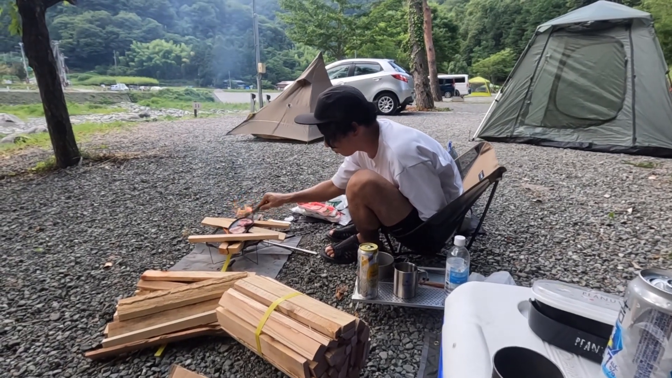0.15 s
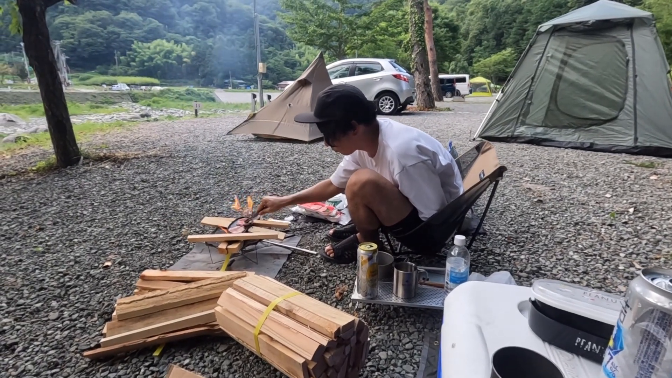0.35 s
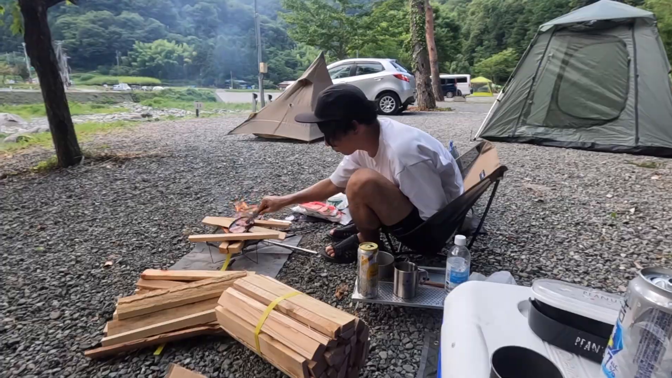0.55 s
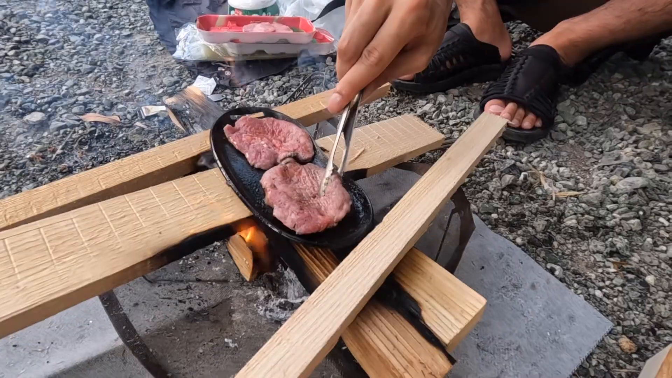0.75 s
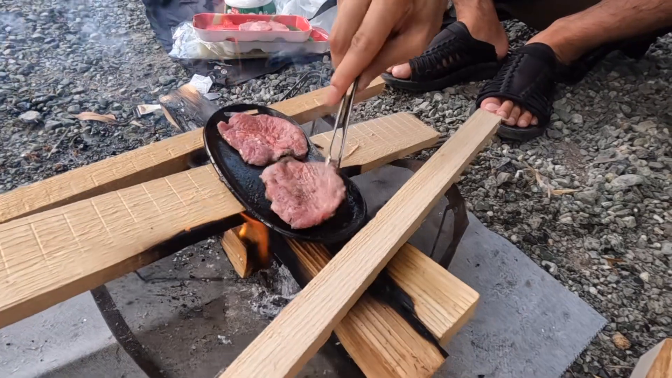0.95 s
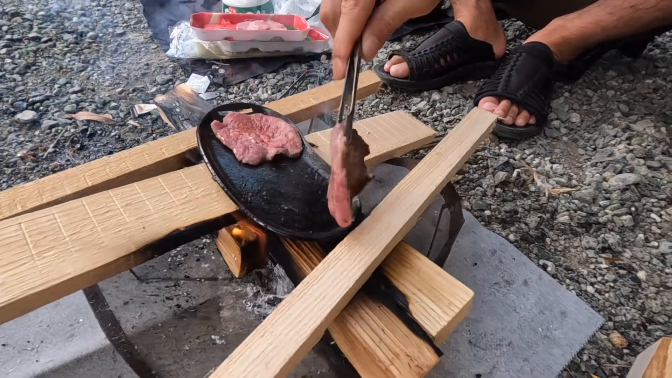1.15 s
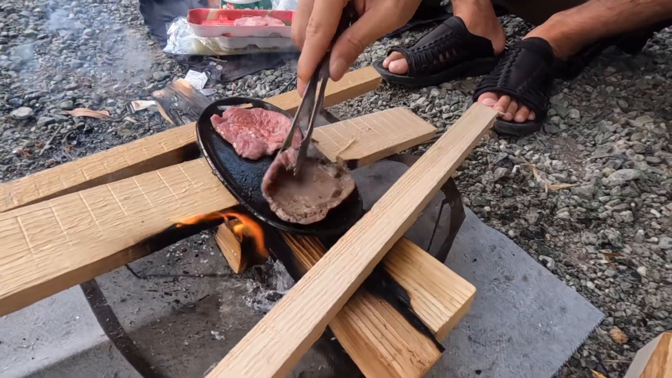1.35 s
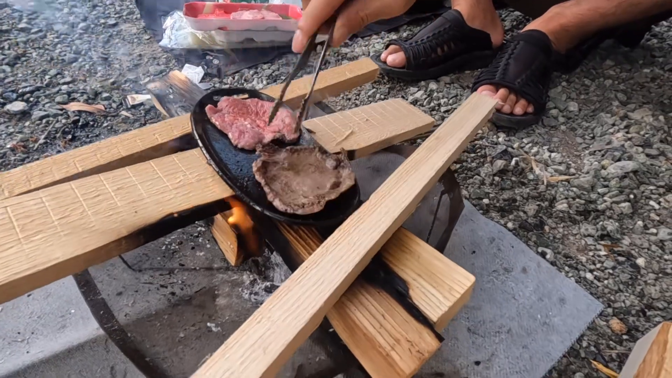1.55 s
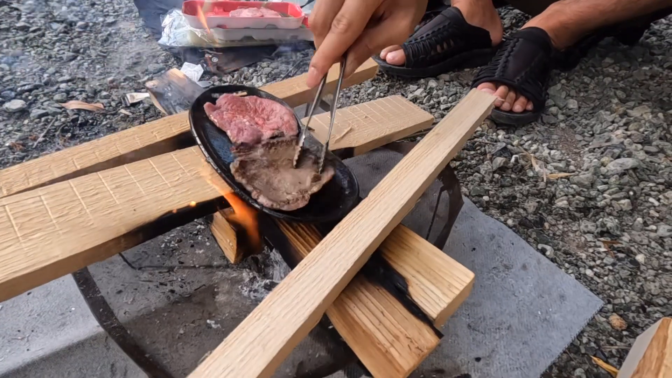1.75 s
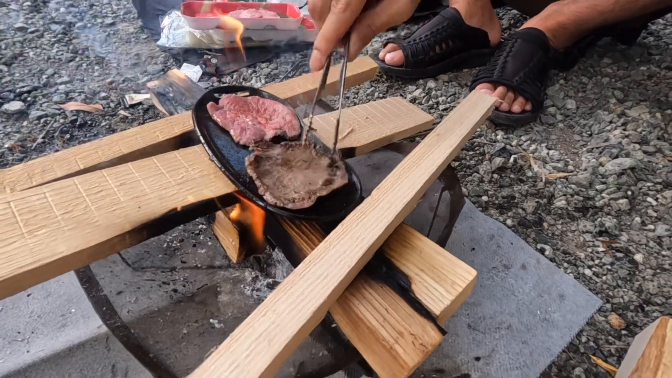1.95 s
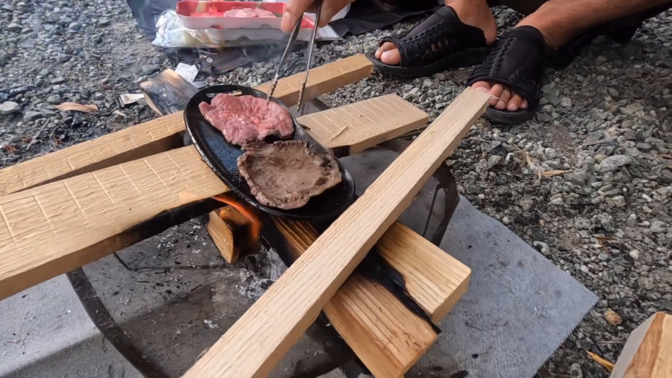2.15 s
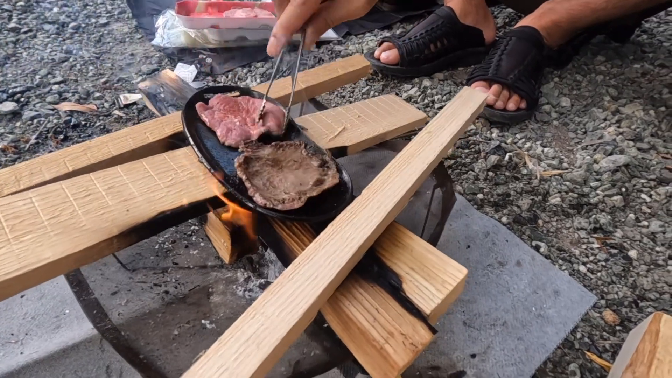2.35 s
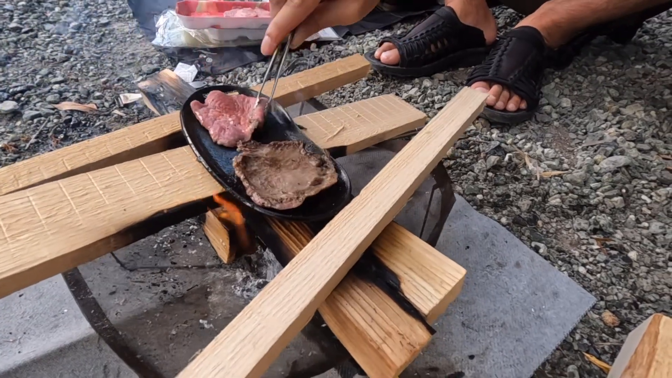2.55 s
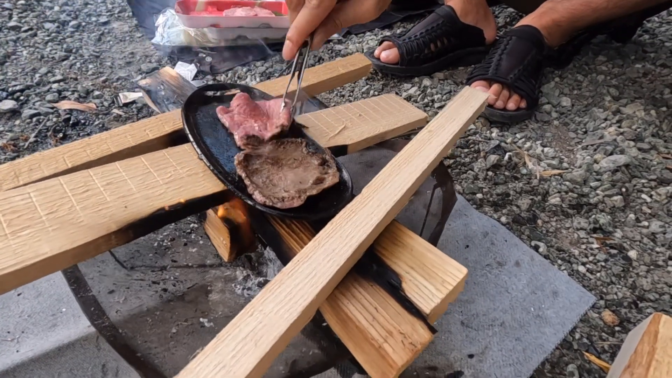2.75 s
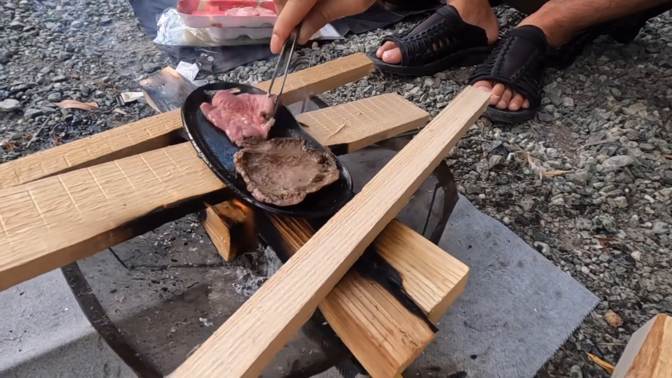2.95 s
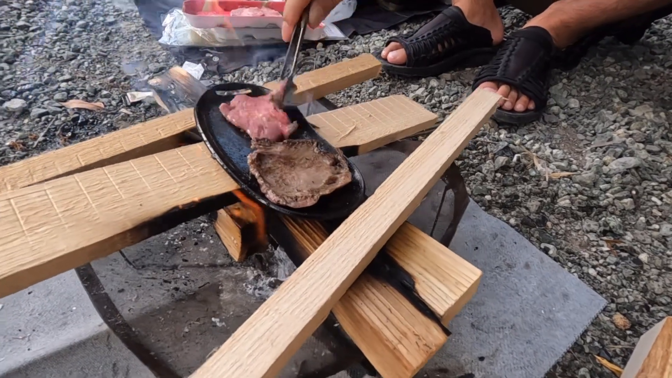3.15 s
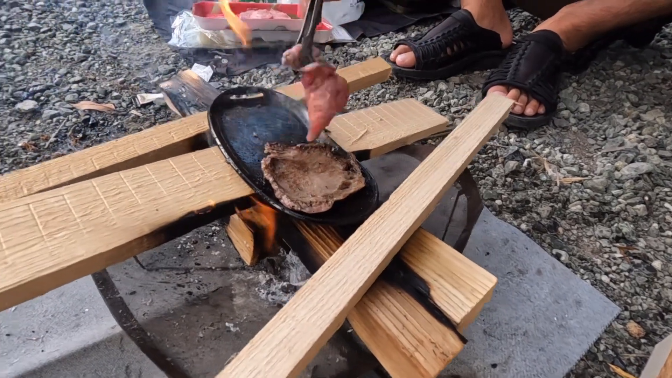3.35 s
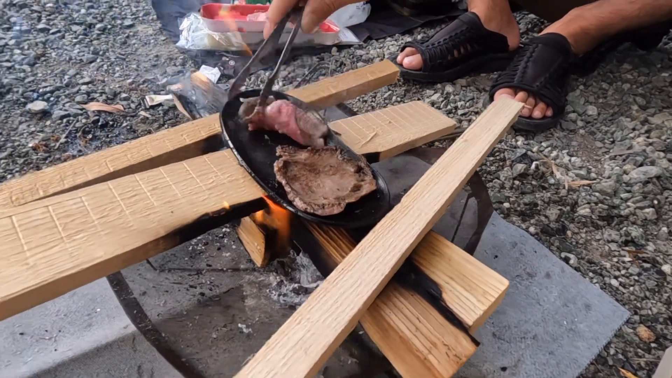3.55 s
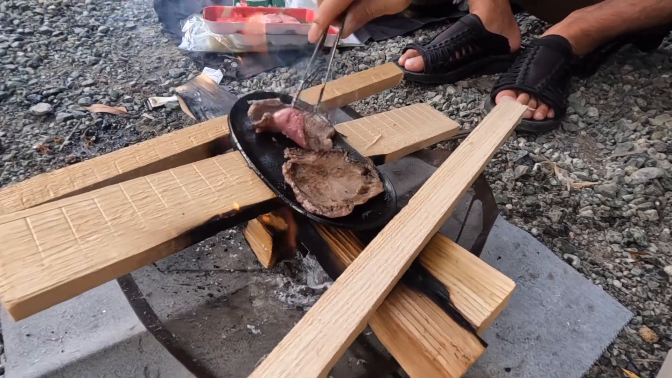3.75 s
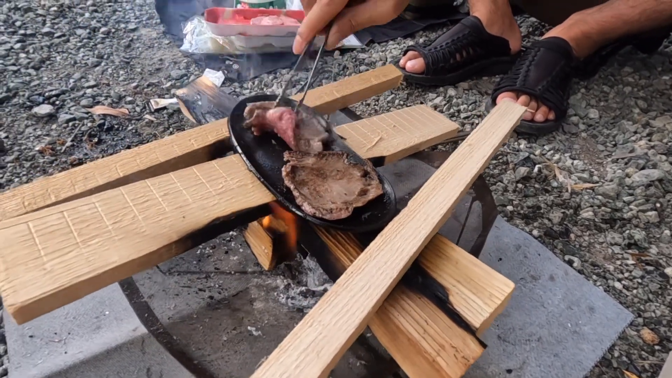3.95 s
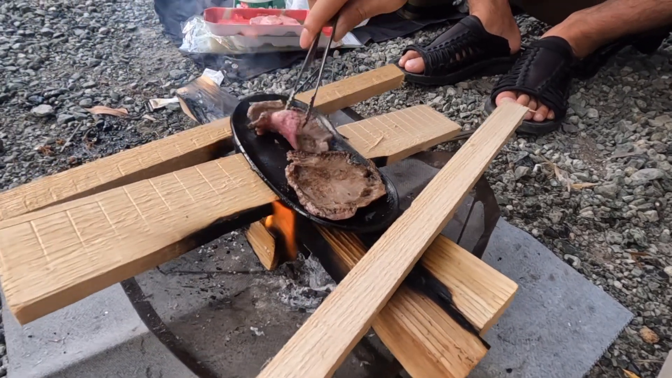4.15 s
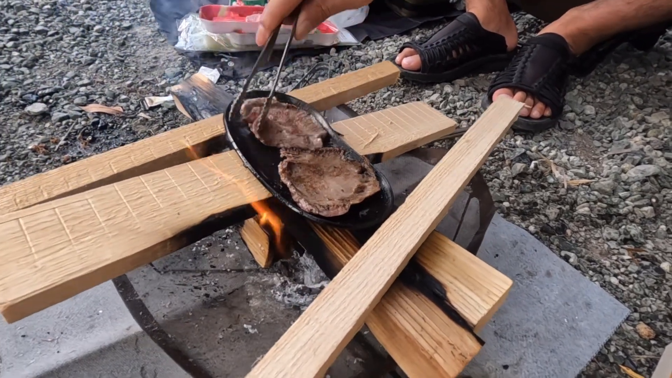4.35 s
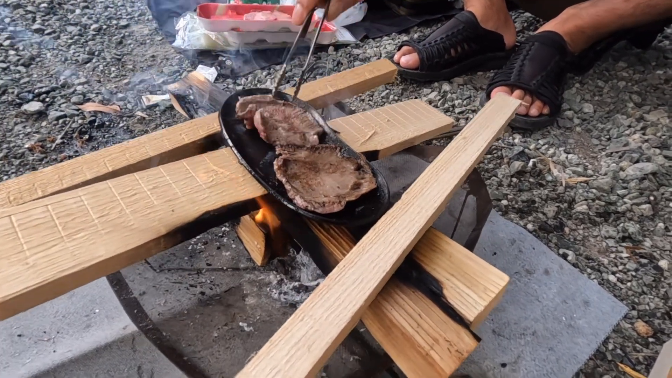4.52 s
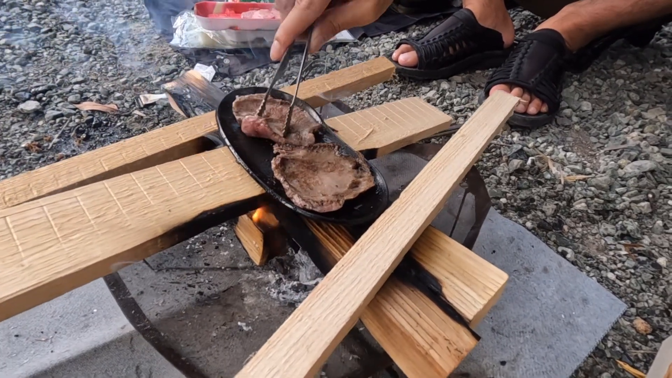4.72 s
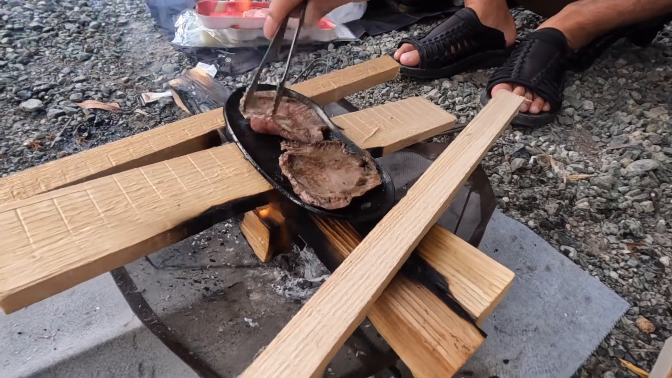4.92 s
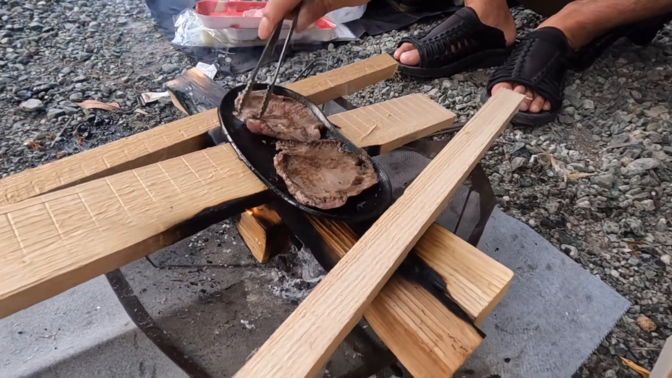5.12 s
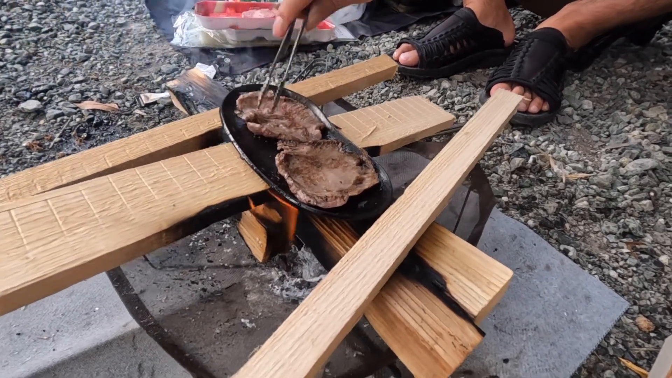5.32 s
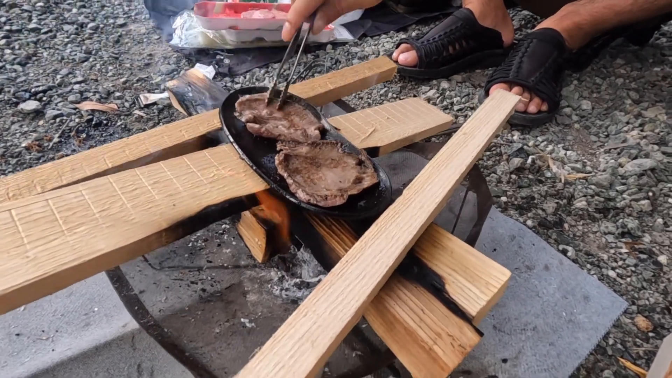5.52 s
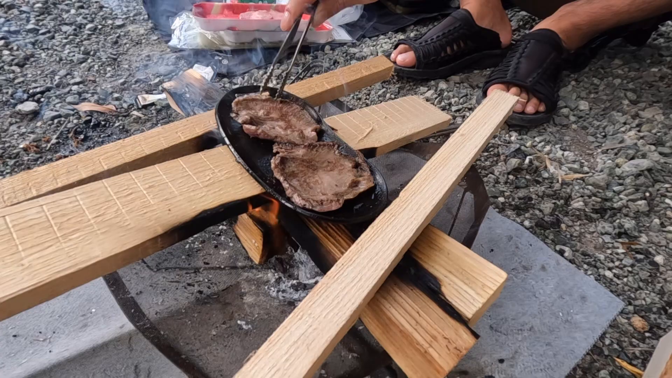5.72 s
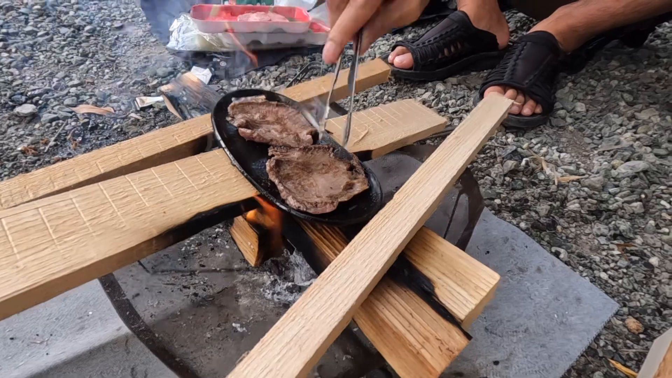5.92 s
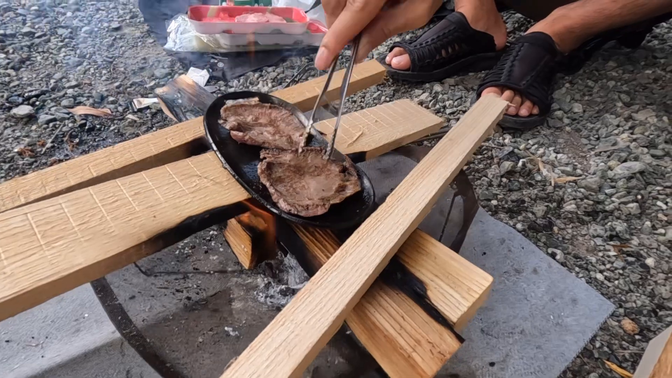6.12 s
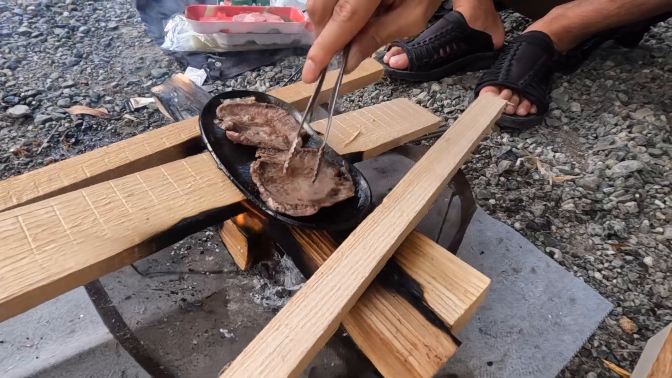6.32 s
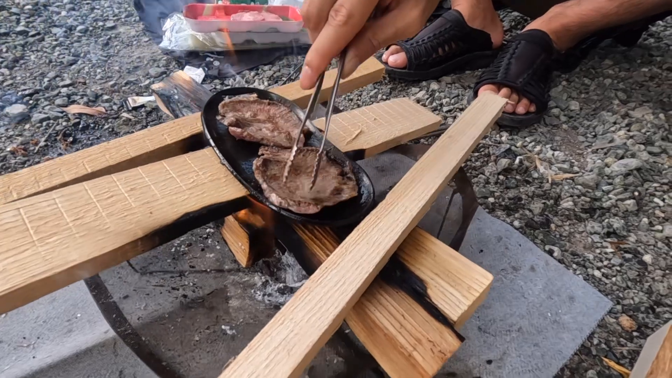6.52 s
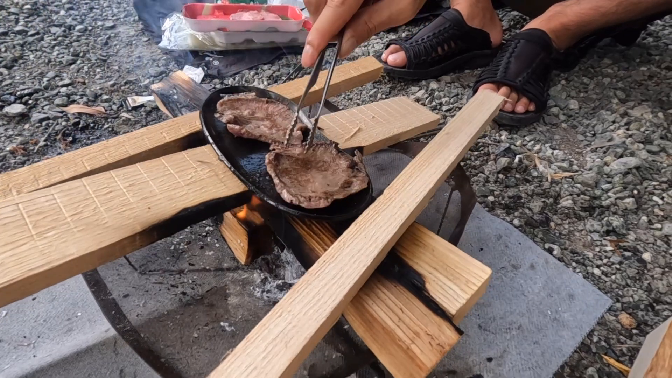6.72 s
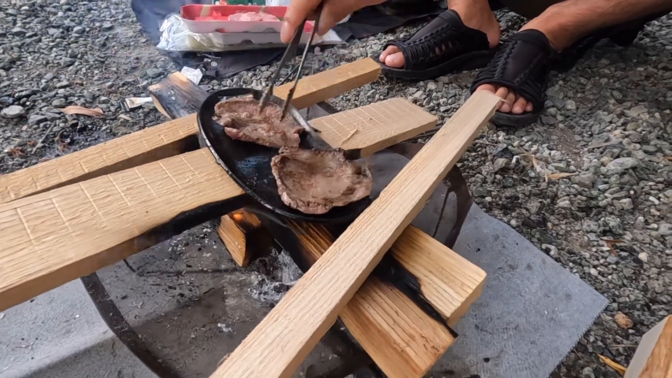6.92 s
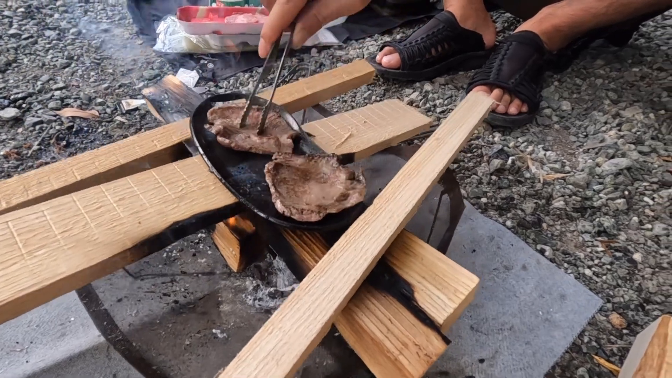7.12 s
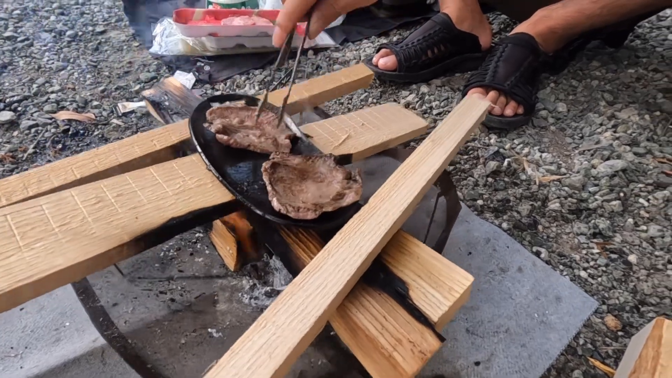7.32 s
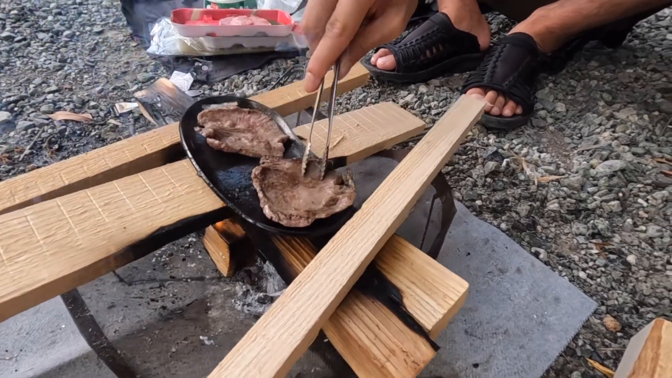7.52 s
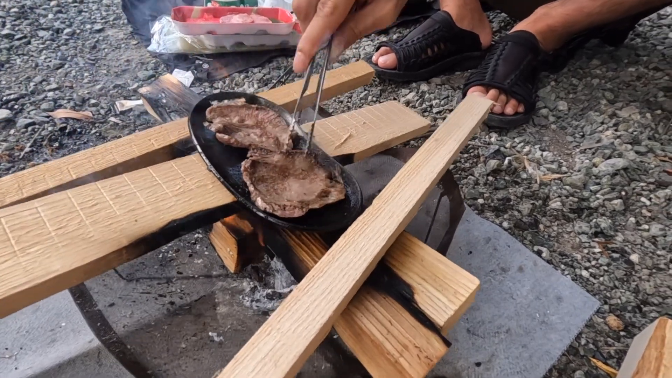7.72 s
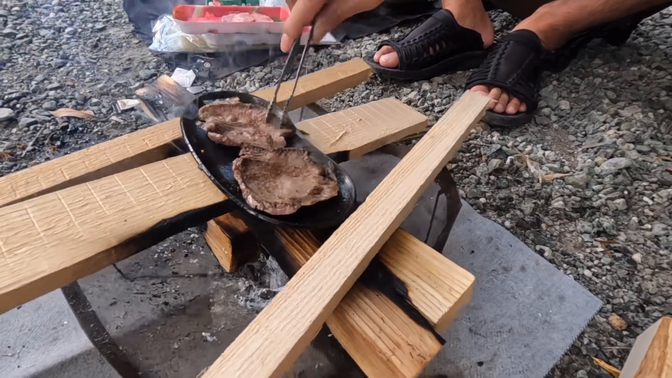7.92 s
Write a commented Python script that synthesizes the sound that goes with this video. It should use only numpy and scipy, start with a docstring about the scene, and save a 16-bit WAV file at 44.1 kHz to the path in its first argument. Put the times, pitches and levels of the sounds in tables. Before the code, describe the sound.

Outdoors, under a second of faint, nearly mono river wash with wind thumping the microphone. A hard cut brings a close iron skillet: thin, crisp sizzling with sharp spits. The fizz strengthens as meat is turned and pressed, surging at about three and a half seconds, then stays dense with wetter simmering. Low flame rumble, river murmur and soft wind buffets continue beneath; loud spits close it.

```python
"""Meat fries in a small iron skillet over a wood fire: steam bubbles burst in the fat as short dying rings
of four sizes (fizz, spray, haze, simmer), with crackle, loud spits and one squeak of steel tongs.
Around it, shaped noise makes flame rumble, wind buffets and river murmur; gusts knock the microphone.
The first 0.68 s are heard from afar: river wash and wind, nearly mono, without the skillet.
The close skillet then reaches two microphone ports with their own phase, lean and width per pitch."""
import sys
import numpy as np
from scipy import signal
from scipy.fft import rfft, irfft, next_fast_len
from scipy.io import wavfile
from scipy.ndimage import uniform_filter1d

SR = 44100
rng = np.random.default_rng(int(sys.argv[2]) if len(sys.argv) > 2 else 0)


def dump_mix(stems):
    """Bounce the given channels to the path in sys.argv[1] as a 16-bit WAV at rate SR."""
    frames = np.atleast_2d(stems).T  # one column per channel
    limited = np.clip(frames, -1, 1)  # hard clip at full scale
    pcm = np.round(limited * 32767).astype(np.int16)
    wavfile.write(sys.argv[1], SR, pcm)


N = 355887
FFT_SIZE = next_fast_len(N + 8192)

# frying: (time [s], fizz level [dB], freshness [0-1, wet meat newly pressed on the iron])
FRYING = [(.69, -45, 0.7), (1.18, -40.5, 0.6), (1.36, -41.5, .2), (1.4, -34.5, .7), (1.55, -37.5, .3),
          (1.72, -36, .3), (1.77, -33, .8), (1.92, -32.5, .9), (1.95, -37, .3), (2.5, -35.5, .3),
          (2.62, -29.5, 0.1), (2.71, -36, .2), (2.76, -29.5, .4), (3.09, -33, 0.5), (3.13, -31, 0.3),
          (3.3, -35.5, .5), (3.53, -37.5, 0.6), (3.545, -27.5, .4), (3.575, -25, .5), (3.59, -23.5, 1),
          (4.6, -28, 0.75), (4.67, -25.5, .9), (4.78, -28, 0), (5.05, -30, .2), (5.35, -28, .1),
          (5.47, -32, .3), (5.55, -28, 0.04), (7.3, -27.5, 0.37), (7.53, -29.5, 0), (7.62, -24.5, 0.4),
          (7.92, -29, 0.3), (8.03, -25, 0.7), (8.07, -25, 0.5)]
# simmer of larger bubbles, growing louder: (time [s], level [dB])
SIMMER_LEVEL = [(.69, -47.5), (1.15, -44.5), (1.37, -46), (1.53, -36), (2, -38.5), (2.8, -36), (3.5, -37),
                (3.6, -35), (4.6, -35), (4.8, -33), (6, -32.5), (7.6, -31.5), (8.07, -32.5)]
# bubble colours, small to large below: (frequency [Hz], relative density [dB per Hz])
HAZE_COLOUR = [(7530, -32), (12800, 10), (14400, -2), (14800, -25), (15000, -21), (15200, -31),
               (15400, -36)]
SPRAY_COLOUR = [(4880, -28), (8300, -8.5), (8840, -4.5), (10200, 4.5), (11000, -6.5), (12100, 4),
                (12800, -28), (16600, -56), (22000, -120)]
FIZZ_COLOUR = [(2410, -31), (4100, -8.5), (4370, -1), (5700, 4), (7610, 0), (8400, -9), (10900, -10.5),
               (18500, -120)]
SIMMER_COLOUR = [(410, -33), (700, -20.5), (841, -13), (996, -6), (1220, -4), (1740, -2.5), (1960, 0.5),
                 (2230, 0), (2970, -7.5), (3250, -10.5), (3570, -5), (3900, -9.5), (4050, -6), (5260, -12),
                 (8910, -120)]
SPRAY_RE_FIZZ_DB, SPRAY_FRESH_DB = -6.5, -6  # second: added at freshness 1
CORE_DB, CORE_FRESH_DB = -1.67, 2  # gain of the fizz core; second: added at freshness 1
REFERENCE_FIZZ_DB = -28  # haze and crackle have their stated level at this fizz level
HAZE_DB, HAZE_DB_PER_FIZZ_DB = -47.5, 0.38
CRACKLE_DB, CRACKLE_DB_PER_FIZZ_DB = -38.5, 0.54


def skillet():
    """Four bubble sizes sputter together in clumps; crackle, spits and tongs join the direct sound."""
    fizz_db, fresh = follow(FRYING)
    simmer_db, = follow(SIMMER_LEVEL)
    sputter_db = waver(60)
    above_reference_db = fizz_db - REFERENCE_FIZZ_DB
    spray_db = fizz_db + SPRAY_RE_FIZZ_DB + SPRAY_FRESH_DB * fresh
    haze_db = HAZE_DB + HAZE_DB_PER_FIZZ_DB * above_reference_db
    crackle_db = CRACKLE_DB + CRACKLE_DB_PER_FIZZ_DB * above_reference_db

    fizz = bubbles(FIZZ_COLOUR, per_s=6000, cycles=13.2, spread_db=1.5, mist_db=1.0)
    fizz = gathered(fizz, CORE_DB + CORE_FRESH_DB * fresh)
    spray = bubbles(SPRAY_COLOUR, per_s=5000, cycles=14.0, spread_db=2.5, mist_db=-2.5, count=8)
    haze = bubbles(HAZE_COLOUR, per_s=2900, cycles=20.5, spread_db=-1.0, mist_db=1.0, count=4)
    simmer = bubbles(SIMMER_COLOUR, per_s=2500, cycles=5.0, spread_db=2.0, mist_db=2.0)

    pair = gain_of(fizz_db + 0.7 * sputter_db) * fizz
    pair += gain_of(spray_db + 0.65 * sputter_db) * spray
    pair += gain_of(haze_db + 0.99 * sputter_db) * haze
    pair += gain_of(simmer_db + 0.8 * sputter_db) * simmer
    pair[0] += gain_of(crackle_db) * crackle(per_s=810, spread_db=7.0) + spits() + tongs()
    return ports(pair)


def bubbles(colour, per_s, cycles, spread_db, mist_db, count=12):
    """Random bursts at several pitches over a noise mist of countless tiny ones; row 2: mist alone."""
    drops, power = np.zeros(N), 0
    for hz in np.geomspace(colour[1][0], min(colour[-2][0], 15000), count):
        impulses = random_impulses(int(per_s * N / SR / count), spread_db, limit=5)
        shape = evened(burst(hz, cycles))
        drops += signal.oaconvolve(impulses, shape)[:N]
        power = power + abs(rfft(shape, FFT_SIZE)) ** 2
    # divide out the bursts' summed spectrum, then impose the colour
    floor = 1e-3 * power.max()
    drops = filtered(drops, lambda f: gain_of(read(colour, f)) / np.sqrt(power + floor))
    white = rng.standard_normal((2, N))
    mist = evened(filtered(white, lambda f: gain_of(read(colour, f))))
    direct = evened(evened(drops) + gain_of(mist_db) * mist[0])
    return np.array([direct, mist[1]])


def random_impulses(number, spread_db, limit):
    """Impulses of either sign at random moments, with exponentially distributed dB sizes up to a limit."""
    at, size, sign = rng.random((number, 3)).T
    size_db = spread_db * np.minimum(-np.log(size + 1e-9), limit)
    return np.bincount((at * N).astype(int), gain_of(size_db) * np.sign(sign - .5), N)


def burst(hz, cycles):
    """One bubble: a quick rise and a few dying cycles."""
    u = np.arange(384) / SR * hz / cycles
    return u ** .5 * np.exp(-3 * u) * np.sin(2 * np.pi * cycles * u)


def gathered(fizz, core_db):
    """Raises or lowers the core of the fizz around 5800 Hz; fresh meat gathers the sound there."""
    core = filtered(fizz, lambda f: np.exp(-((f - 5800) / 900) ** 2))
    return fizz + (gain_of(core_db) - 1) * core


# loud single spits: (time [s], level [dB], pitch [Hz])
SPIT_EVENTS = [(0.7282, -18, 5990), (0.7867, -22, 4610), (0.8234, -16.5, 5210), (.8471, -24, 4650),
               (0.8608, -19, 6120), (0.88, -22, 5640), (0.8854, -23, 4910), (.9389, -27, 4820),
               (0.9624, -25, 5210), (1.1761, -17, 6200), (1.2051, -20, 5940), (1.2392, -21, 5640),
               (1.2888, -16, 5040), (1.358, -20, 4690), (1.3843, -13.5, 5200), (1.3905, -18, 5210),
               (1.413, -14.5, 5900), (1.62, -11, 4030), (1.8386, -13, 5810), (1.8494, -13, 5730),
               (1.87, -14, 5680), (1.9149, -12, 6290), (1.948, -17, 6630), (1.975, -16, 6070),
               (2.0466, -18, 1590), (2.1074, -20, 2200), (2.251, -19, 6070), (2.603, -15.0, 5990),
               (2.7114, -10, 5380), (3.1758, -15, 6070), (3.2726, -16, 7280), (3.4866, -13, 5080),
               (3.7785, -10, 5730), (4.1172, -12, 5910), (4.1277, -13, 5250), (4.8879, -11.0, 9900),
               (5.8387, -14, 2240), (6.2185, -15, 5040), (6.241, -16, 5300), (6.278, -13, 1810),
               (7.0281, -17, 5470), (7.103, -14.5, 1750), (7.831, -8, 5300), (7.8649, -8, 5430),
               (7.955, -14, 5730), (7.9612, -13, 5770), (7.9848, -9, 5810)]
POP_SHARE = 0.63  # pop against ring


def spits():
    """Each spit: a sharp wide-band pop plus a three-cycle ring at its pitch."""
    sharp, out = pop(), np.zeros(N + 384)
    for s, db, hz in SPIT_EVENTS:
        ring = burst(hz, 3)
        ring = ring / abs(ring).max()
        out[round(s * SR):][:384] += gain_of(db) * ((1 - POP_SHARE) * ring + POP_SHARE * sharp)
    return out[:N]


def crackle(per_s, spread_db):
    """Sharp pops at random moments, most of them small."""
    impulses = random_impulses(int(per_s * N / SR), spread_db, limit=3.5)
    return evened(signal.oaconvolve(impulses, pop())[:N])


# colour of sharp pops, floored at -45 dB in use: (frequency [Hz], relative density [dB per Hz])
POP_COLOUR = [(530, -52), (900, -19), (1190, -13), (1570, -10), (2000, -4), (2640, -10.0), (2930, -17),
              (3570, -14), (3870, -12), (4390, -3), (5870, 1.0), (8400, -15), (11700, -7.5), (14300, -21),
              (14900, -60)]


def pop():
    """Minimum-phase pop: its energy comes as early as the colour allows, then rings off."""
    hz = abs(np.fft.fftfreq(1024, 1 / SR))
    log_gain = np.log(gain_of(np.maximum(read(POP_COLOUR, hz), -45)))
    shape = np.fft.ifft(np.exp(np.conj(signal.hilbert(log_gain)))).real[:384]
    return shape / abs(shape).max()


# steel partials: (frequency [Hz], relative level [dB])
TONG_PARTIALS = [(5230, -1.5), (7020, 4), (7600, -7)]
# tongs slide on the iron: (time [s], level [dB], length [s])
TONG_SLIDES = [(2.737, -31.5, 0.036)]


def tongs():
    """A short slide sets the thin steel singing: steady partials under a tapered window."""
    out = np.zeros(N)
    for s, db, length_s in TONG_SLIDES:
        t = np.arange(round(length_s * SR)) / SR
        ring = sum(gain_of(part_db) * np.sin(2 * np.pi * hz * t) for hz, part_db in TONG_PARTIALS)
        out[round(s * SR):][:len(t)] += gain_of(db) * ring * signal.windows.tukey(len(t), .6)
    return out


# direct sound shared by the ports: (frequency [Hz], likeness [0-1])
PORT_LIKENESS = [(600, 0.68), (1300, 0.97), (2200, 1), (3200, 0.49), (4500, 0.94), (6200, 0.97),
                 (9500, .999), (12000, 1), (15000, 0.98)]
# phase by which the left port leads; negative, the right leads: (frequency [Hz], phase [rad])
PORT_LEAD = [(0, 0), (1290, -0.3), (2330, -1.4), (3010, -1.7), (3360, -0.5), (3790, -0.5), (4050, 0.0),
             (11100, -0.0), (12300, 0.1), (14300, -0.0), (14700, -1.8), (15200, -3.8)]
# left over right, before the width: (frequency [Hz], level difference [dB])
PORT_LEAN = [(700, 3), (1200, -1), (1800, 0.5), (2300, -2), (2800, -8), (3400, -9.5), (4200, -3.5),
             (5200, -3), (6400, 0.03)]
# gain of left minus right: (frequency [Hz], width [dB])
PORT_WIDTH = [(5500, 0), (6150, -4), (6400, -48), (9600, -60), (9800, -12), (11400, 18), (12200, 17),
              (15000, 6)]


def ports(pair):
    """The right port gets the direct sound phase-shifted and tilted, plus a scattered share of its own."""
    hz = np.fft.rfftfreq(FFT_SIZE, 1 / SR)
    direct, scattered = rfft(pair, FFT_SIZE)
    alike = np.clip(read(PORT_LIKENESS, hz), 0, 1)
    lean = gain_of(read(PORT_LEAN, hz) / 2)
    shifted = np.exp(-1j * read(PORT_LEAD, hz)) * direct
    left = direct * lean
    right = (alike * shifted + np.sqrt(1 - alike ** 2) * scattered) / lean
    middle = left + right
    side = gain_of(read(PORT_WIDTH, hz)) * (left - right)
    return irfft(np.array([middle + side, middle - side]) / 2, FFT_SIZE)[:, :N]


# low air between gusts: (time [s], flame rumble level [dB], river murmur level [dB])
AIR_LEVELS = [(0, -46.5, -53.5), (.66, -46, -53.5), (.72, -52, -58.5), (1.3, -48.5, -57), (2, -47.5, -54.5),
              (3.15, -46.5, -52.5), (3.3, -39.5, -53), (4, -44.5, -52), (4.9, -38, -50.5), (5.35, -40, -51),
              (5.5, -43.5, -51), (6.4, -41.5, -50), (7, -43.5, -47), (8.07, -42, -50)]
# colours: (frequency [Hz], relative density [dB per Hz])
RUMBLE_COLOUR = [(8.8, -31), (15, 0), (40, 3.5), (68, -1), (88, -5), (110, -17), (190, -120)]
BUFFET_COLOUR = [(54, -58), (92, -2), (147, -6), (195, -14), (250, -42), (430, -120)]
MURMUR_COLOUR = [(120, -24), (205, -2), (302, -0.5), (404, -4.5), (493, -4.5), (678, -8), (800, -8.5),
                 (1040, -39), (1760, -120)]
BUFFET_RE_MURMUR_DB = 1
# one value each for rumble, buffet, murmur
FLUTTER_DB = 1.5, 1.4, 0.7
CALM_LIKENESS, GUST_LIKENESS_LOSS = (0.95, 0.94, .83), (0.9, 1, .45)  # loss at one-sidedness 1


def air(close):
    """Flame rumble, wind buffet, river murmur: mono from afar, less alike at the ports in one-sided gusts."""
    rumble_db, murmur_db = follow(AIR_LEVELS)
    push_db, shove_db, sided = gusts()
    levels_db = rumble_db + push_db, murmur_db + BUFFET_RE_MURMUR_DB + shove_db, murmur_db
    out = np.zeros((2, N))
    for k, colour in enumerate((RUMBLE_COLOUR, BUFFET_COLOUR, MURMUR_COLOUR)):
        level_db = levels_db[k] + FLUTTER_DB[k] * waver(14)
        low = gain_of(level_db) * steadied(noise(colour, 1.0), 0.078)
        likeness = np.clip(CALM_LIKENESS[k] - GUST_LIKENESS_LOSS[k] * sided, 0, 1)
        angle = close * np.arccos(likeness) / 2
        out += np.cos(angle) * low[0] + np.array([[1], [-1]]) * np.sin(angle) * low[1]
    return out


# gusts: (peak time [s], fade to 1/e [s], rumble change [dB], buffet change [dB], one-sidedness [0-1])
GUST_EVENTS = [(.12, 0.065, 6, 5.5, 0), (.32, 0.11, 11, 8.5, 0), (.67, .03, 5, 3, 0),
               (1.56, 0.036, 3, 4, 0), (2.08, .07, 5, 0, 0), (2.68, .06, 5.5, 2, 0),
               (3.22, .06, 2, 8.5, .7), (4.17, 0.05, 4, 1, 0), (4.8, .05, -1, 2, 0), (4.92, .04, 3, -1, 0),
               (5.282, 0.044, 3, 5, 0), (5.98, 0.053, 2, 2, .5), (6.3, 0.19, -1.5, 1.5, 0.2),
               (6.74, 0.1, 9, 7.5, .9), (7.18, 0.078, 8, 8.5, 1), (7.45, 0.18, 1.5, 1, .3),
               (7.78, .05, 6, 7, 0.4), (7.95, .04, 3, 2, 0)]
RISE_PER_FADE = 0.71


def gusts():
    """Each gust rises faster than it fades: rumble change, buffet change and one-sidedness, summed."""
    t, total = np.arange(N) / SR, np.zeros((3, N))
    for s, fade_s, *push in GUST_EVENTS:
        width_s = fade_s * np.where(t < s, RISE_PER_FADE, 1)
        total += np.exp(-((t - s) / width_s) ** 2) * np.array(push)[:, None]
    return total


def steadied(x, seconds):
    """Divides a narrow noise by its smoothed level, to even out its chance swells."""
    length = int(seconds * SR)
    power = uniform_filter1d(uniform_filter1d(x ** 2, length), length)
    return evened(x / np.sqrt(power + .05))


# gusts knock the microphone: (time [s], level [dB], frequency [Hz], t60 [s], left over right [dB])
KNOCK_EVENTS = [(.303, -17, 33.7, 0.26, 0), (3.212, -26.5, 46, 0.15, 18), (2.6, -35, 360, 0.054, 12)]


def knocks():
    """A gust pushes the microphone membrane into a dying swing: a damped sine with a soft onset."""
    out = np.zeros((2, N))
    t = np.arange(SR // 2) / SR
    for s, db, hz, t60_s, lean_db in KNOCK_EVENTS:
        swing = gain_of(db - 60 * t / t60_s) * np.sin(2 * np.pi * hz * t) * (1 - np.exp(-t / 0.0045))
        out[:, round(s * SR):][:, :len(t)] += swing * gain_of([[lean_db / 2], [-lean_db / 2]])
    return out


# river wash from afar: (frequency [Hz], relative density [dB per Hz])
RIVER_COLOUR = [(440, -16), (750, -11), (954, -9), (1040, -11), (1340, -8), (1430, -11), (1820, -8.5),
                (2530, -14), (3340, -19), (4190, -11.5), (4700, -20.5), (7700, -22.5), (10800, -33),
                (12000, -19.5), (15400, -36)]
# gain of the wash's treble: (time [s], level [dB])
TREBLE_LEVEL = [(0, 3.5), (.2, -4), (.4, -4), (.5, 1), (.535, 9.5), (.57, 1), (.68, 1.5)]
RIVER_DB = -46
WIDE_HZ, WIDE_DB = 11600, -1  # the wash spreads out only above this pitch


def river():
    """A smooth distant wash of noise whose treble dips, then swells once."""
    wash, other = noise(RIVER_COLOUR, 1.4)
    spread = filtered(other, lambda f: gain_of(WIDE_DB) / (1 + (WIDE_HZ / (f + 1)) ** 40))
    wash = wash + np.array([[1], [-1]]) * spread
    treble = filtered(wash, lambda f: 1 / (1 + (5500 / (f + 1)) ** 4))
    treble_db, = follow(TREBLE_LEVEL)
    return gain_of(RIVER_DB) * (wash + (gain_of(treble_db) - 1) * treble)


def noise(colour, patchy_db):
    """Two noises from independent random short-time spectra, sharing one pattern of drifting patches."""
    frames = N // 256 + 5
    a, b, c, d, patches = rng.standard_normal((frames, 513, 5)).T
    patches = evened(uniform_filter1d(uniform_filter1d(patches, 8, 0), 10, 1))
    spectra = np.array([a + 1j * b, c + 1j * d]) * gain_of(patchy_db * patches)
    flat = signal.istft(spectra, nperseg=1024, noverlap=768)[1][:, :N]
    return evened(filtered(flat, lambda f: gain_of(read(colour, f))))


def waver(rate_hz):
    """Slow chance of unit RMS: sines of random phase from 4 Hz up to rate_hz."""
    t = np.arange(0, N + 64, 64) / SR
    slow = np.zeros(len(t))
    for f in np.geomspace(4, rate_hz, 30):
        slow += np.sin(2 * np.pi * (f * t + rng.random())) / f ** 0.45
    return evened(np.interp(np.arange(N) / SR, t, slow))


def gain_of(db):
    """Amplitude factor of a level in dB."""
    return 10 ** (np.asarray(db) / 20)


def evened(x):
    """Scales to unit RMS over all rows."""
    return x / np.sqrt(np.mean(x ** 2) + 1e-20)


def read(points, hz):
    """Value of a spectrum table on a log-frequency axis."""
    f, value = np.transpose(points)
    return np.interp(np.log(hz + 1), np.log(f + 1), value)


def follow(rows):
    """Every column of a time table, one value a sample."""
    s, *columns = np.transpose(rows)
    return [np.interp(np.arange(N) / SR, s, c) for c in columns]


def filtered(x, response):
    """Applies a response given as a function of Hz."""
    return irfft(rfft(x, FFT_SIZE) * response(np.fft.rfftfreq(FFT_SIZE, 1 / SR)), FFT_SIZE)[..., :N]


CLOSE_S, CHANGE_S = .68, 0.0025


def scene():
    """Far river, then a quick crossfade to the close skillet; air and knocks run throughout."""
    close = np.clip((np.arange(N) / SR - CLOSE_S) / CHANGE_S, 0, 1)
    return close * skillet() + (1 - close) * river() + air(close) + knocks()


EDGE_HZ = 15600


def record(dry):
    """Band limit: a linear-phase low-pass."""
    lowpass = signal.firwin(511, EDGE_HZ, window=("kaiser", 9), fs=SR)
    return signal.oaconvolve(dry, lowpass[None], "same")


dry = scene()
out = record(dry)
dump_mix(out)
```